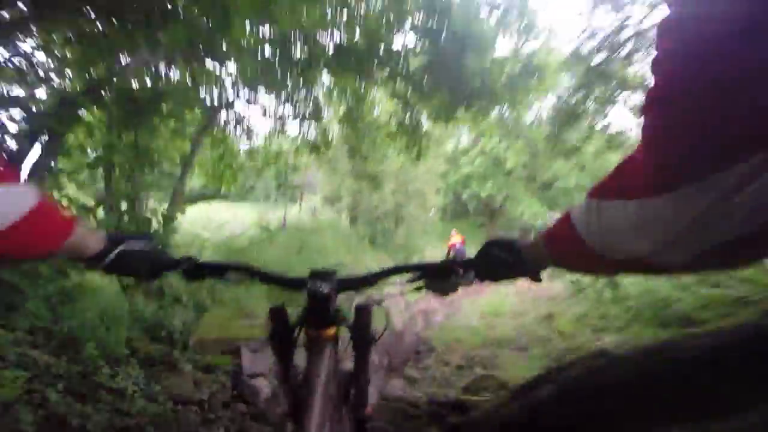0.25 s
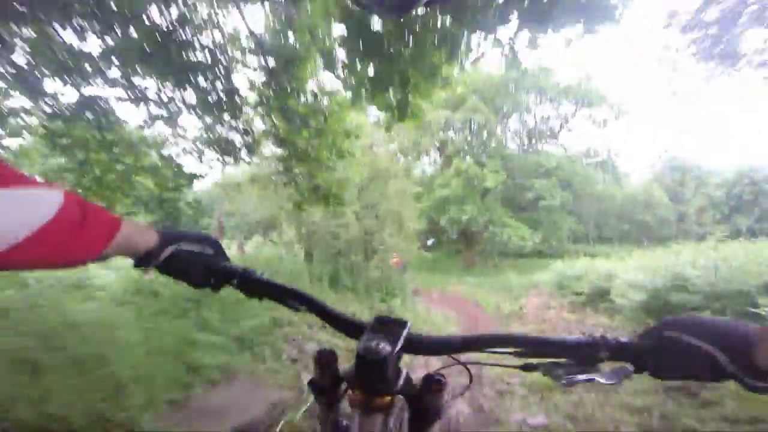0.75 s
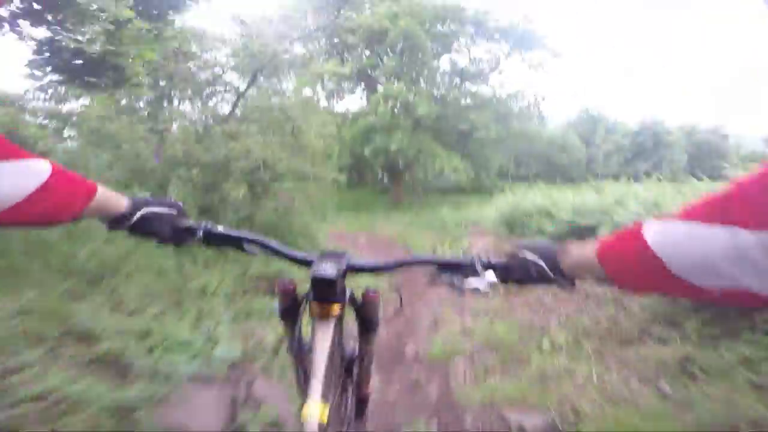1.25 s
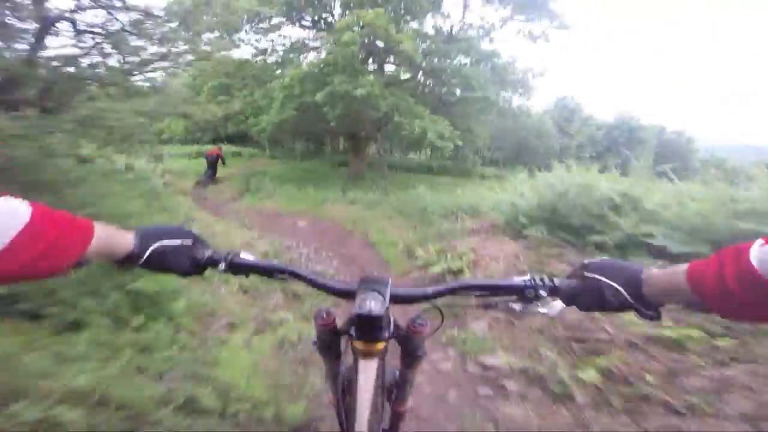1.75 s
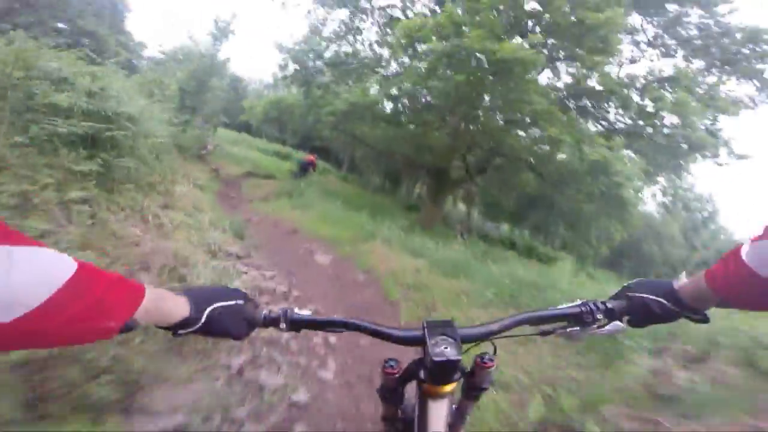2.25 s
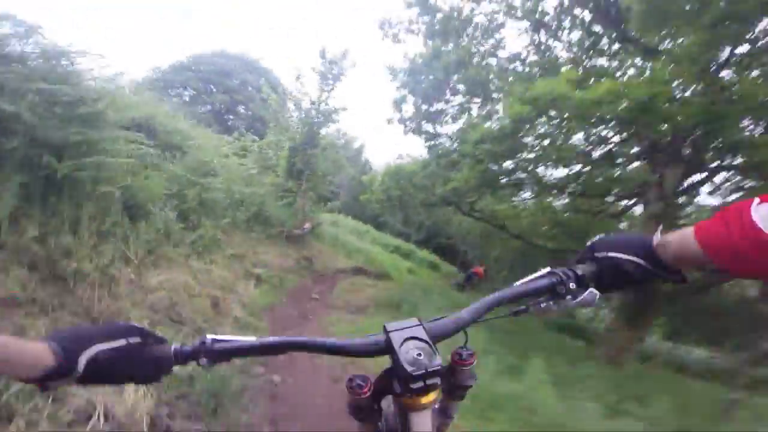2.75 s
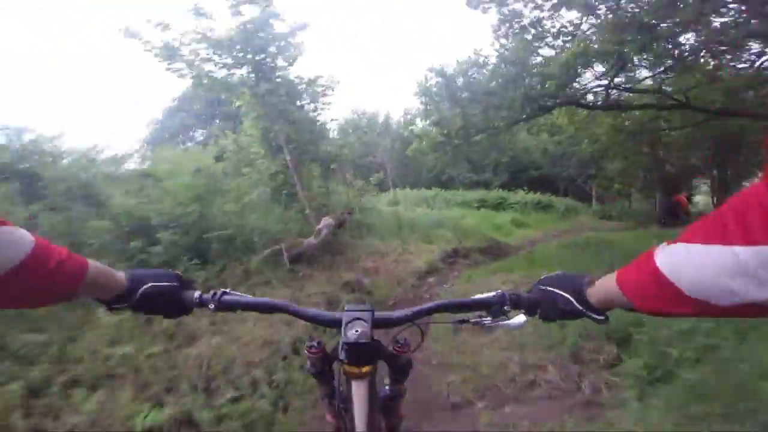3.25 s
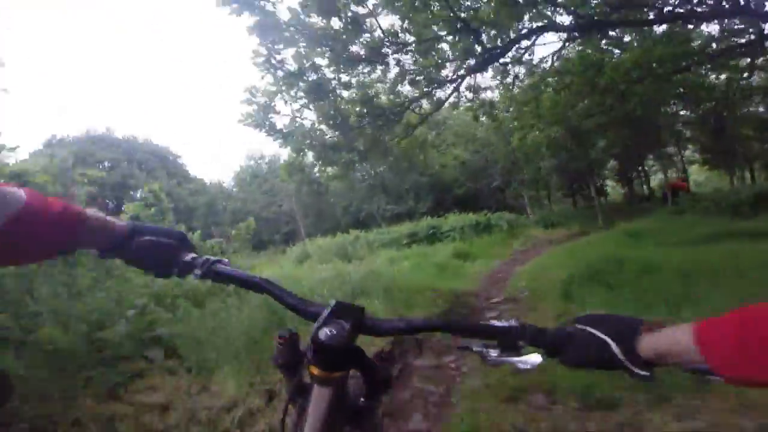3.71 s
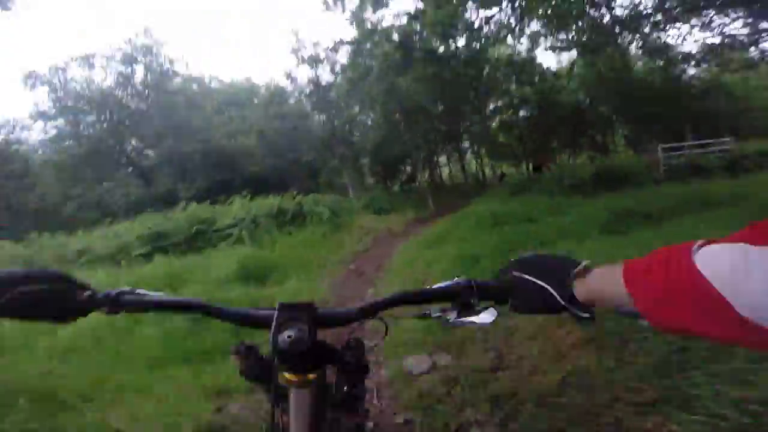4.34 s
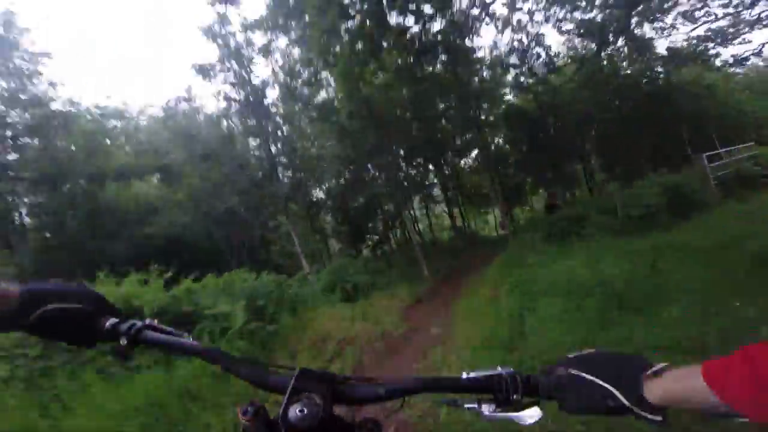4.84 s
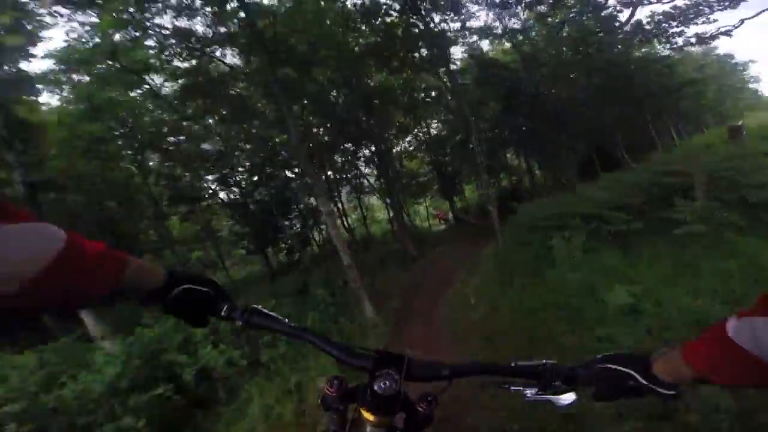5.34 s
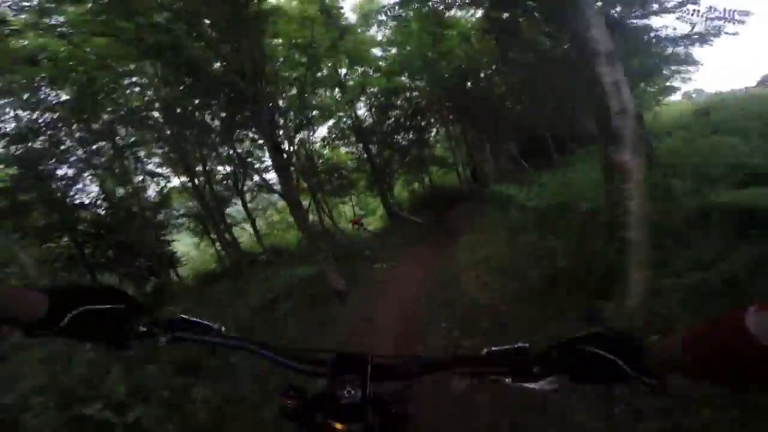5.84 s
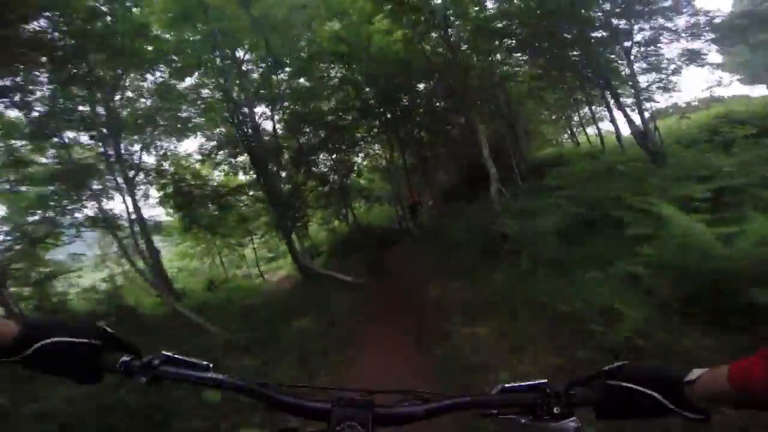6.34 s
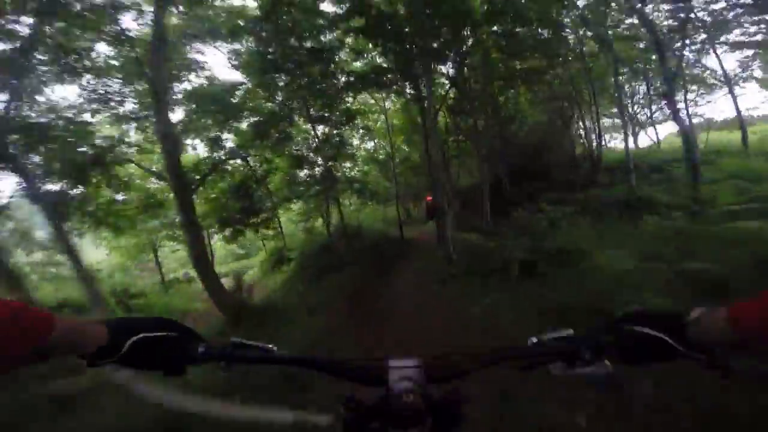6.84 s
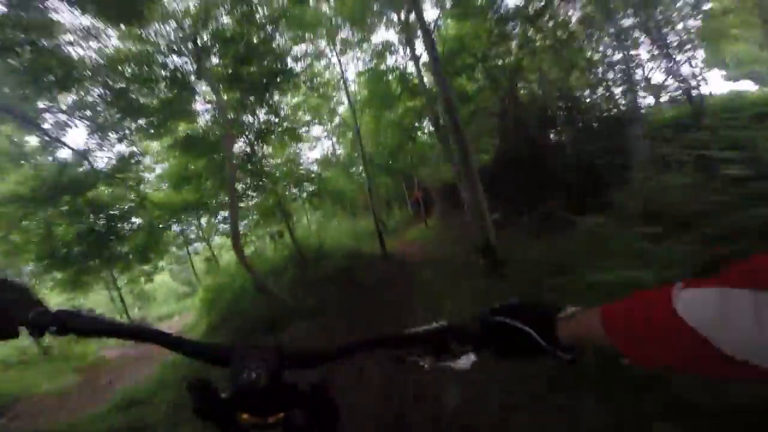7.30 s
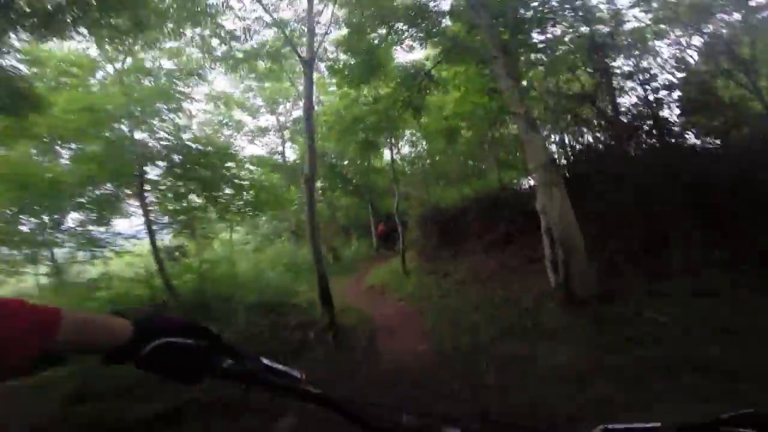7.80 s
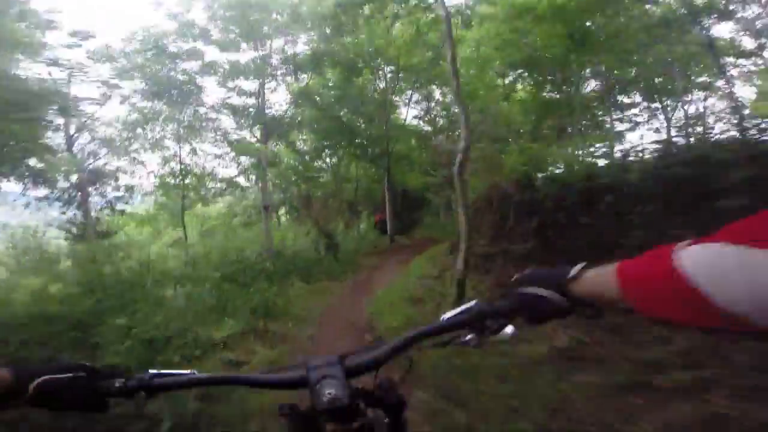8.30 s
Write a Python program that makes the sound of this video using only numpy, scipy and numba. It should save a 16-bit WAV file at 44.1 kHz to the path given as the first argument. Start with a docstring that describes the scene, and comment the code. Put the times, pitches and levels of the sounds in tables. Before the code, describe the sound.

Jolt after jolt shakes a mountain bike on an outdoor dirt track, each bump landing as a deep, boxy thump with sharp plastic clacks and an occasional small metal ping. Underneath run an uneven rumble, a soft hiss of wind and short gritty tyre crunches. Everything sounds close and enclosed, picked up through a plastic camera housing strapped to the rider, and the clatter keeps going to the end.

```python
"""A faint hiss of wind and tyre grit over a low rumble, then jolt after jolt: a mountain bike going down
a rough dirt trail. The microphone is a camera's, in a sealed plastic housing strapped to the rider's chest.
Each jolt shoves the housing (a deep thump) and rings shell and strap; right at the microphone the loose
mount ticks and rattles. Wind and grit arrive through the housing's resonances, strap and frame rumble
underneath, and the loudest jolts overload."""
import sys
import numpy as np
from scipy import signal
from scipy.io import wavfile
from scipy.ndimage import uniform_filter1d
from numba import njit

SR = 44100
rng = np.random.default_rng(int(sys.argv[2]) if len(sys.argv) > 2 else 0)


def transcribe(u):
    """Save the signal u as a 16-bit wav file named by the first command-line argument.

    u: samples, shape (n,) or (channels, n), limited to [-1, 1]; the rate is SR.
    q: integer samples, one column per channel.
    """
    v = np.clip(np.atleast_2d(u).T, -1, 1)
    q = np.round(v * 32767).astype(np.int16)
    wavfile.write(sys.argv[1], SR, q)


N = 377496
T = np.arange(N) / SR

# Levels in the tables are relative; each source adds its own gain.
# the ride down the trail: (time [s], wind and grit hiss [dB], body sway [dB], strap rumble [dB])
RIDE_LEVELS = [(0.0, -56, -41, -37), (0.14, -61.5, -40, -40.5), (0.43, -57.5, -54, -60),
               (0.69, -53, -48, -52), (0.88, -61.5, -42, -49.5), (1.24, -56, -45, -51.5),
               (1.64, -60, -45, -45), (1.76, -60, -39, -46.5), (2.05, -59.5, -47, -54.5),
               (2.67, -63.5, -51, -54), (3.22, -54, -43, -43), (3.62, -50, -43, -34.5),
               (3.81, -54.5, -45, -43), (4.05, -56.5, -42, -58), (4.22, -49.5, -41, -37),
               (4.46, -62, -43.5, -48), (4.79, -55, -46, -46), (5.17, -66.5, -51, -59.5),
               (5.58, -57.5, -44.5, -49), (5.77, -53, -40.5, -38.5), (5.96, -65, -44, -44.5),
               (6.1, -67, -49, -67), (6.32, -58, -50, -58), (6.67, -59, -43, -53), (6.87, -56.5, -48, -52),
               (7.27, -46.5, -36, -39.5), (7.46, -60, -39.5, -48), (7.82, -65, -52, -63),
               (8.18, -64, -49.5, -55), (8.56, -55, -43, -48)]
# bumps: (time [s], shove [dB], strap ring [dB re shove], strap pitch [Hz], shell knock [dB re shove],
# clack of the mount [dB])
TRAIL_JOLTS = [(0.067, -3.5, -35, 121, -16.5, -42), (0.228, -3.5, -11, 162, -15.5, -16.5),
               (0.392, -34, 17, 132, -42, -70), (0.7461, -16.5, -20, 149, -42, -62),
               (0.7545, -3.5, -12, 126, -15.5, -14), (0.9285, -7, -5.5, 146.5, -13, -62),
               (1.0982, -10, -6, 120.4, -17.5, -53), (1.2943, -1.5, -41, 152, -19.5, -12),
               (1.441, -2, -34, 159, -15.5, -9), (1.552, -10.5, -5, 130, -15, -34),
               (1.7387, -5.5, -6, 182, -12, -10.5), (1.8297, -18, -25, 131, -37, -56),
               (2.005, 4.5, -12, 129, -23, -2), (2.2442, -3.5, -10.5, 150, -15, -13),
               (2.4593, -4, -16, 180, -15.5, -12), (2.6085, -8.5, -4.5, 180, -19, -36),
               (2.741, -6, -17, 152, -18.5, -30.5), (2.8921, -9, -8.5, 121, -23, -35),
               (3.083, -6.5, -5.5, 130, -42, -65), (3.1742, -16, -12, 182, -55, -32),
               (3.4959, -3, -9, 153.4, -22.5, -33), (3.7771, -1, -2, 131, -18, -26.5),
               (4.0043, -3.5, -31, 123, -20, -32), (4.1767, -1, -6, 179.4, -21.5, -51),
               (4.29, 2.5, -22.5, 191, -19.5, -9.5), (4.433, -3, -40, 185, -20.5, -59),
               (4.5908, -3, -24, 169, -13, -14.5), (4.7628, -4, -9, 183.6, -13.5, -8),
               (4.9765, -4, -16, 188, -14.5, -16.5), (5.1602, -21.5, -33.5, 127, -36.5, -74),
               (5.3183, -8, -9, 139, -22, -55), (5.58, -3.5, -16, 173, -18, -63),
               (5.7973, -4.5, -15, 118, -15.5, -14), (5.916, -5, -12.5, 180, -18.5, -62.5),
               (6.063, -9, -13.5, 188.6, -20, -60.5), (6.3079, -10.5, -9, 196, -39.5, -49),
               (6.496, -20, -15, 118, -65, -85), (6.64, -3.5, -18, 126, -29, -52),
               (6.8198, -4, -18, 125, -23, -51), (7.0504, -4, -10.5, 182, -30, -52),
               (7.194, -25.5, -22, 157, -35, -70), (7.271, -22, -20, 150, -40, -70),
               (7.2874, -3.5, -22, 183, -13.5, -9.5), (7.457, -1, -33, 150, -17, -13),
               (7.617, -5.5, -14.5, 193.5, -14.5, -14), (7.8287, -10.5, -23.5, 145, -21.5, -32),
               (8.0303, -3.5, -30, 129.6, -19, -27.5), (8.1894, -12, -29, 123.3, -37.5, -64),
               (8.362, -5, -11, 140, -22.5, -67)]
# ticks of the loose mount: (time [s], level [dB], clack pitch [Hz], treble snap [dB re level])
LOOSE_TICKS = [(0.068, -14, 1840, -39), (0.3966, -38.5, 2030, -30), (0.547, -38.5, 2160, -19),
               (0.6974, -31, 2320, -17), (0.8148, -38, 2030, -44), (0.9297, -25, 1880, -38),
               (0.943, -35.5, 2310, -37), (0.977, -44, 1940, -52), (1.1019, -40, 1570, -27),
               (1.137, -41, 2020, -51), (1.276, -35.5, 2040, -49), (1.345, -47, 1960, -59),
               (1.458, -38, 2350, -39), (1.6006, -22, 2170, -31), (1.743, -48, 1570, -29),
               (1.762, -29.5, 2040, -38), (1.8567, -40.5, 2250, -48), (2.0108, -22.5, 2000, 0.5),
               (2.0574, -39.5, 2100, -46), (2.1577, -43, 2430, -5), (2.289, -32, 2190, -38.5),
               (2.497, -40, 2000, -39), (2.7651, -40, 1990, -50), (2.877, -23.5, 2300, -22),
               (2.949, -28.5, 2010, -49), (3.1004, -37.5, 2010, -15), (3.1175, -26, 2080, -43),
               (3.137, -35, 2280, -24), (3.2225, -40, 2270, -29), (3.3481, -30, 1970, -56.5),
               (3.4376, -33.5, 2370, -6.5), (3.5162, -17.5, 2040, -37), (3.65, -22.5, 2000, -38),
               (3.8279, -19.5, 2200, -38), (3.845, -29.5, 2300, -30), (4.0238, -32, 2220, -22),
               (4.0604, -19.5, 2150, -36), (4.1171, -15.5, 2278, -23.5), (4.179, -26.5, 1700, -38),
               (4.1998, -14, 2100, -27), (4.2949, -25, 1960, -19), (4.3302, -37.5, 2260, -27),
               (4.386, -35.5, 2050, -34), (4.4152, -35.5, 2620, -11), (4.4337, -11.5, 1990, -41),
               (4.559, -46, 2280, -11), (4.5967, -31, 2100, -20.5), (4.6382, -42.5, 2270, -47),
               (4.8138, -32, 2100, -36), (4.85, -34, 2240, -14), (4.8874, -38.5, 2380, -10.5),
               (5.0137, -40.5, 2050, -41), (5.3179, -39.5, 1600, -51), (5.338, -40, 2010, -38.5),
               (5.549, -40, 2610, -7.5), (5.583, -19.5, 2020, -27), (5.6454, -19, 2230, -40),
               (5.6538, -16, 2120, -33.5), (5.8189, -23, 2130, -33), (5.9153, -22, 1760, -49),
               (5.9474, -25.5, 2060, -40), (6.0659, -25.5, 2190, -51.5), (6.5515, -11, 1587, -18),
               (6.937, -55, 2140, -15), (7.0886, -23, 2140, -34), (7.1008, -15, 2285, -22),
               (7.208, -41, 2350, -9), (7.23, -37, 2400, -8.5), (7.328, -35, 2350, -24),
               (7.3409, -31.5, 1990, -36), (7.4201, -37.5, 2060, -23), (7.501, -38, 2200, -35),
               (7.5128, -34, 2030, -33), (7.6596, -41, 2010, -36), (7.838, -32, 2110, -34),
               (8.0402, -40, 2240, -18), (8.3637, -22.5, 2190, -36), (8.3997, -33.5, 2226, -25),
               (8.4219, -17.5, 2300, -26), (8.544, -33.5, 2320, -15.5)]
# the clearest pings of metal: (time [s], level [dB])
METAL_PINGS = [(0.068, -48), (0.2283, -51.5), (0.755, -58), (0.945, -53), (1.296, -57), (1.35, -66),
               (1.745, -49.5), (2.005, -42.5), (2.877, -50), (3.345, -50.5), (4.385, -60.5), (4.6374, -60),
               (6.5493, -41), (7.0891, -44), (7.328, -53), (8.365, -55)]
# the loudest crunches of grit, down at the tyres: (time [s], level [dB])
GRIT_CRUNCHES = [(0.201, -54), (0.583, -53.5), (1.641, -58.5), (1.692, -56.5), (1.961, -57), (2.184, -53.5),
                 (2.105, -58), (2.405, -61.5), (3.87, -65), (3.925, -63), (3.968, -58), (4.077, -48),
                 (4.231, -48.5), (4.262, -68), (4.365, -58), (4.528, -55), (4.547, -49), (4.657, -58),
                 (4.704, -59.5), (4.739, -55), (5.075, -62.5), (5.216, -60), (5.379, -60.5), (5.438, -63.5),
                 (5.852, -57.5), (5.932, -56.5), (5.956, -58), (5.975, -61), (6.169, -59), (6.887, -66),
                 (6.904, -69), (7.682, -60.5), (7.809, -63), (7.916, -60.5)]
# air and wall resonances around the microphone: (frequency [Hz], width [Hz], level [dB])
HOUSING_BANDS = [(1624, 150, 5.5), (2254, 565, 7), (2900, 130, -0.5), (3440, 780, -3), (4590, 1170, -4.5),
                 (5690, 680, -5), (7130, 1600, -14.5), (8430, 900, -22.5), (11000, 4600, -52.5)]
# modes of the parts that ring: (frequency [Hz], level [dB], time to fall 60 dB [s])
SHELL_MODES = [(377, 3, 0.011), (485, -3, 0.031), (609, -7.5, 0.045), (674, 1.5, 0.043), (855, -4.5, 0.022),
               (984, -14.5, 0.053), (1463, -7, 0.0099)]
STRAP_MODES = [(119, -10.5, 0.26), (153, -1, 0.14), (193.5, -4.5, 0.14)]
MOUNT_MODES = [(69, -47.2, .061), (121, -54.6, .127), (200, -35, .014), (253, -52.7, .043)]
BUCKLE_MODES = [(505, -2, .04), (1090, -6, .05)]
METAL_MODES = [(1808, -3, .08), (1808, -7, .26), (2790, -21, .15)]


def undb(db):
    return 10 ** (np.asarray(db) / 20)


def unit_rms(x):
    return x / np.sqrt(np.mean(x ** 2))


def add(out, start_s, piece):
    i = int(start_s * SR)
    out[i:i + len(piece)] += piece[:N - i]


def bandpass(x, low_hz, high_hz, order=2):
    return signal.sosfilt(signal.butter(order, [low_hz, high_hz], "band", fs=SR, output="sos"), x)


def ring(x, modes):
    """Damped modes driven by x; a unit impulse starts each at its own level."""
    out = 0
    for hz, db, t60 in modes:
        pole = np.exp(2j * np.pi * hz / SR - np.log(1000) / (t60 * SR))
        out = out + undb(db) * signal.lfilter([1], [1, -pole], x).imag
    return out


def through_housing(drives):
    """The way in to the microphone: one drive per resonance, filtered twice for deep valleys."""
    out = 0
    for (hz, width, db), x in zip(HOUSING_BANDS, drives):
        peak = signal.iirpeak(hz, hz / width, SR)
        out = out + undb(db) * signal.lfilter(*peak, signal.lfilter(*peak, x))
    return out


def wander(rate_hz):
    """Glides from one random value to the next, with a spread of 1."""
    hold = int(SR / rate_hz)
    steps = np.repeat(rng.standard_normal(N // hold + 1), hold)
    return unit_rms(uniform_filter1d(steps, hold)[:N])


def grains(per_second, spread_db, length_s):
    """An envelope of scattered bursts of many sizes."""
    hits = rng.random(N) < per_second / SR
    sizes = undb(spread_db * rng.exponential(size=N).clip(0, 3.5))
    return unit_rms(signal.oaconvolve(hits * sizes, np.hanning(int(length_s * SR)))[:N])


def after_jolts(levels_db, decay_s):
    """An envelope that jumps at each jolt and dies away."""
    kicks = np.zeros(N)
    for (start_s, *_), db in zip(TRAIL_JOLTS, levels_db):
        add(kicks, start_s, undb([db]))
    return signal.lfilter([1], [1, -np.exp(-1 / (decay_s * SR))], kicks)


def wind_and_grit():
    """Wind over the housing, fine grit across its resonances, and chain clinks that each excite one."""
    wind = undb(2.2 * wander(rate_hz=30))
    grit = grains(per_second=40, spread_db=2.1, length_s=.008)
    drives = []
    for hz, _, _ in HOUSING_BANDS:
        bright_grit = min(hz / 4000, 1) * undb(-5) * grit
        chain = undb(2) * grains(per_second=38, spread_db=3.6, length_s=.015)
        drives.append((wind + bright_grit + chain) * rng.standard_normal(N))
    shell = ring((wind + grit / 2) * rng.standard_normal(N), SHELL_MODES)
    return unit_rms(through_housing(drives)) + undb(-10) * unit_rms(shell)


def sizzle():
    """Fine, flickering noise on top of the hiss."""
    treble = bandpass(rng.standard_normal(N), 8500, 12000)
    return unit_rms(treble * undb(3 * wander(rate_hz=20)))


def strap_rumble():
    """Trail roughness keeps the chest strap humming unevenly."""
    shake = rng.standard_normal(N) * undb(4.5 * wander(rate_hz=25))
    return unit_rms(ring(bandpass(shake, 105, 190, order=3), STRAP_MODES))


def frame_rumble():
    """Dull shaking of the frame below the rider."""
    return unit_rms(bandpass(rng.standard_normal(N), 55, 105))


def body_sway():
    """Slow pressure swings from the moving body just behind the microphone."""
    return unit_rms(bandpass(rng.standard_normal(N), 12, 40, order=3))


def microphone_noise():
    """Faint self-noise, strongest in the bass."""
    bass = unit_rms(signal.lfilter([1], [1, -.99], rng.standard_normal(N)))
    return undb(-64) * bass + undb(-82.5) * rng.standard_normal(N)


def jolts():
    """A half-sine shove sets the mount swinging; the shell rings at once, the strap on the rebound."""
    shove, strap, knocks = np.zeros((3, N))
    t = np.arange(8000) / SR
    rebound = (1 - np.exp(-t / .024)) ** 2 * np.exp(-t / .013)
    for start_s, db, strap_db, strap_hz, shell_db, _ in TRAIL_JOLTS:
        shove_ms = 2.495 - .1471 * min(db, 0)  # a weaker shove lasts longer
        half_sine = np.sin(np.pi * np.linspace(0, 1, int(shove_ms * SR / 1000)))
        add(shove, start_s, undb(db) * half_sine ** 1.1)
        add(strap, start_s, undb(db + strap_db + 8.5) * rebound * np.sin(2 * np.pi * strap_hz * t))
        chatter = .06 * rng.standard_normal(90)  # colours each knock anew
        knock = np.r_[np.hanning(24) / 12, chatter]
        add(knocks, start_s - .0007, undb(db + shell_db) * knock)  # the hard contact comes first
    padded = signal.lfilter(*signal.butter(1, 1500, fs=SR), shove)  # padding rounds the shove
    leak_hz, leak_q = 29.7, 1.04  # slow pressure leaks out of the housing
    omega = 2 * np.pi * leak_hz
    leak = signal.bilinear([1, 0, 0], [1, omega / leak_q, omega ** 2], SR)
    thump = signal.lfilter(*leak, padded + ring(padded, MOUNT_MODES))
    return thump + strap - ring(knocks, SHELL_MODES)


def mount_hits():
    """Clacks inside the jolts, then loose ticks: (time [s], level [dB], clack [Hz], clink [Hz],
    clink [dB re level], snap [dB re level], tap [dB re level])."""
    low_clink_hz, high_clink_hz = 3560, 4560
    hits = []
    for start_s, *_, db in TRAIL_JOLTS:
        hits.append((start_s, db, 2016, rng.uniform(low_clink_hz, high_clink_hz), -22, -36, -22.5))
    for start_s, db, clack_hz, snap_db in LOOSE_TICKS:
        bright, mid_pitched = snap_db > -18, 1900 < clack_hz < 2285
        clink_hz = 1.84 * clack_hz
        if bright:
            clink_hz = min(low_clink_hz, clink_hz)
        elif mid_pitched:
            clink_hz = high_clink_hz
        clink_db = -4.5 + .36 * snap_db  # brighter ticks clink more
        tap_db = -30 - .2 * snap_db + 9 * mid_pitched  # and tap the shell less
        hits.append((start_s, db, clack_hz, clink_hz, clink_db, snap_db, tap_db))
    return hits


def mount_rattle():
    """Close up, each hit clacks, clinks and cracks with noise, and rings shell, buckle, strap and metal."""
    tones, rattle, crack, snap, taps, pings = np.zeros((6, N))
    t = np.arange(1300) / SR
    rise = 1 - np.exp(-t / .00027)
    hits = mount_hits()
    noises = rng.standard_normal((len(hits), len(t)))
    for (start_s, db, clack_hz, clink_hz, clink_db, snap_db, tap_db), noise in zip(hits, noises):
        detuned_hz = clink_hz * (1 + .018 * rng.standard_normal())
        clack = -np.sin(2 * np.pi * clack_hz * t) * np.exp(-t / .0013)
        clink = undb(clink_db) * np.sin(2 * np.pi * detuned_hz * t) * np.exp(-t / .0019)
        add(tones, start_s, undb(db + 7.5) * rise * (clack + clink))
        add(rattle, start_s, undb(db) * rise * np.exp(-t / .0031) * noise)
        add(crack, start_s, undb(db + clink_db + 14) * rise * np.exp(-t / .0024) * noise)
        add(snap, start_s, undb(db + snap_db + 27.5) * rise * np.exp(-t / .0017) * noise)
        add(taps, start_s, undb(db + tap_db) * np.exp(-t / .0004) * (.12 * noise - .1))
        add(pings, start_s, undb([-40.5 + .4 * (db + snap_db)]))  # metal rings faintly with the treble
    for start_s, db in METAL_PINGS:
        add(pings, start_s, undb([db]))
    walls = through_housing([rattle] * 3 + [crack] * 3 + [snap] * 3)  # low, middle and top resonances
    tapped = ring(taps, SHELL_MODES + BUCKLE_MODES) + undb(-4) * ring(taps, STRAP_MODES)
    return tones + walls + tapped + undb(8) * ring(pings, METAL_MODES)


def tyre_crunches():
    """Grit crunches under the tyres: short bright puffs of noise, heard through the housing."""
    puffs, t = np.zeros(N), np.arange(900) / SR
    for start_s, db in GRIT_CRUNCHES:
        add(puffs, start_s, undb(db) * (1 - np.exp(-t / .0014)) * np.exp(-t / .018))
    drives = [(hz / 4000) ** .82 * puffs * rng.standard_normal(N) for hz, _, _ in HOUSING_BANDS]
    return undb(15.5) * through_housing(drives)


@njit
def gain_control(x, threshold, attack_s, release_s):
    """Gain that drops fast on loud sound and recovers slowly."""
    out, level = np.empty(len(x)), 0.
    for i in range(len(x)):
        size = abs(x[i])
        level += (size - level) / (SR * (attack_s if size > level else release_s))
        out[i] = x[i] * min(1., threshold / (level + 1e-9))
    return out


def scene():
    """The ride in mono, from the rider's chest."""
    times, *levels_db = np.array(RIDE_LEVELS).T
    hiss_gain, sway_gain, rumble_gain = [undb(np.interp(T, times, db)) for db in levels_db]
    _, shove_db, strap_db, _, _, clack_db = np.array(TRAIL_JOLTS).T
    hiss_gain /= 1 + after_jolts(clack_db + 22, decay_s=.034)  # the hiss dips after a hard clack
    rumble_gain += after_jolts(shove_db + strap_db - 19.5, decay_s=.017)  # the strap rumbles on
    sway_gain += after_jolts(shove_db - 42, decay_s=.027)
    hiss = hiss_gain * (wind_and_grit() + undb(-29) * sizzle())
    rumble = rumble_gain * (strap_rumble() + undb(-5.5) * frame_rumble())
    sway = sway_gain * body_sway()
    return (hiss + rumble + sway + jolts() + mount_rattle() + tyre_crunches() + microphone_noise())[None]


def record(dry):
    """In the camera, gain control ducks after jolts, the converter clips and the top is cut."""
    ducked = gain_control(dry[0], threshold=.42, attack_s=.0076, release_s=.06)
    clipped = np.clip(ducked, -.97, .97)
    top_cut = signal.ellip(10, .1, 75, 11900, fs=SR, output="sos")
    return signal.sosfilt(top_cut, clipped)[None]


dry = scene()
out = record(dry)
transcribe(out)
```